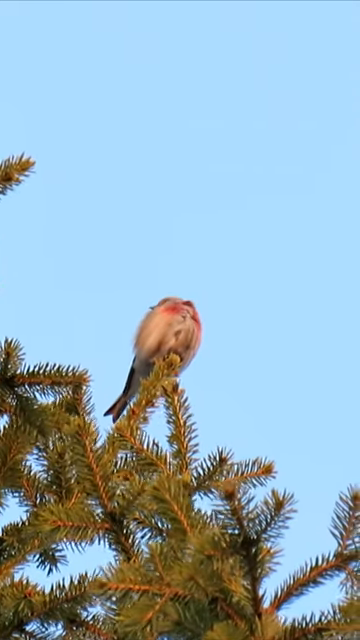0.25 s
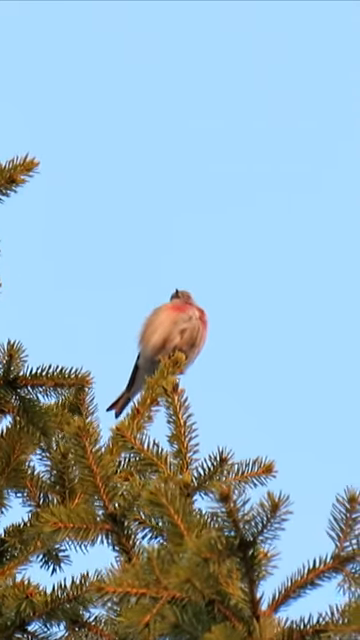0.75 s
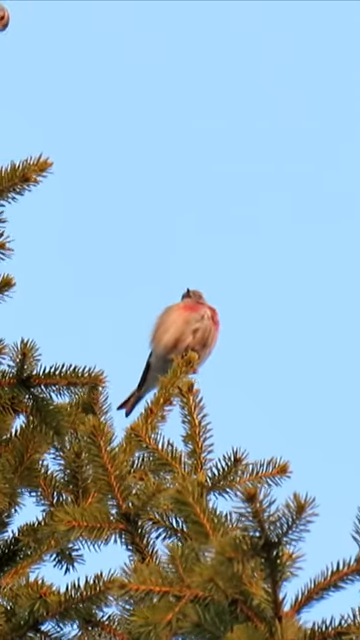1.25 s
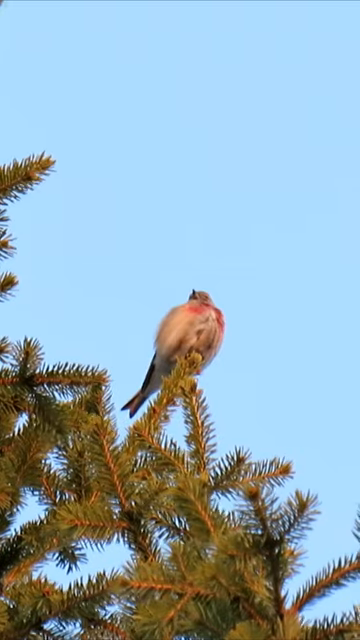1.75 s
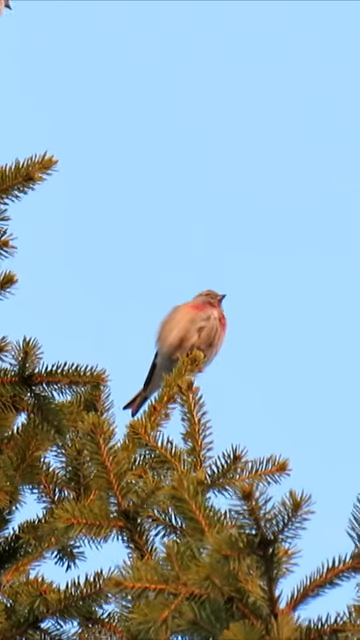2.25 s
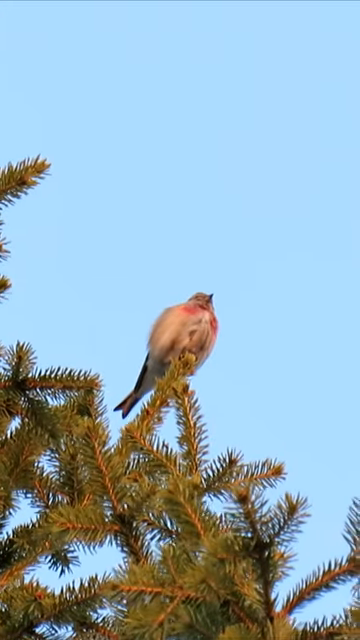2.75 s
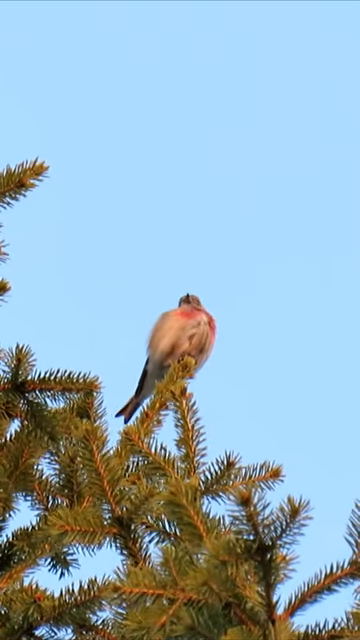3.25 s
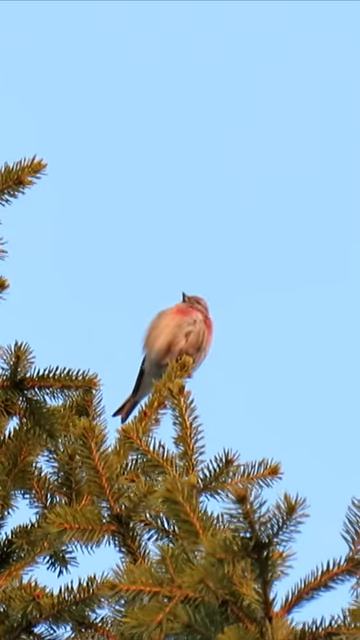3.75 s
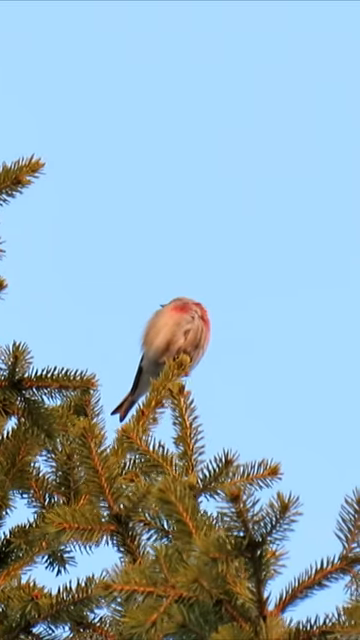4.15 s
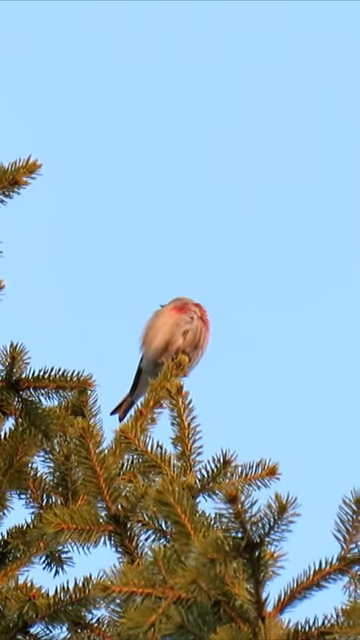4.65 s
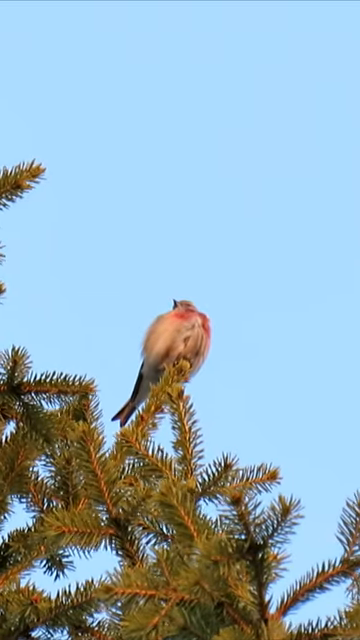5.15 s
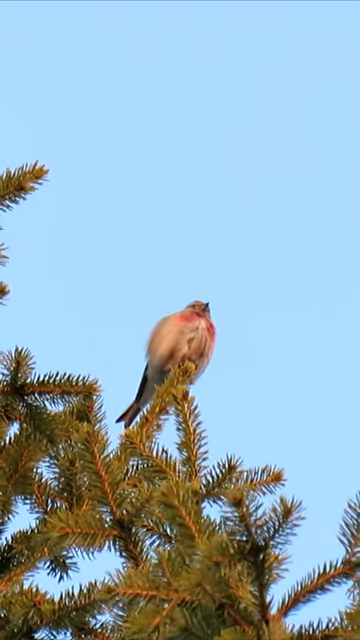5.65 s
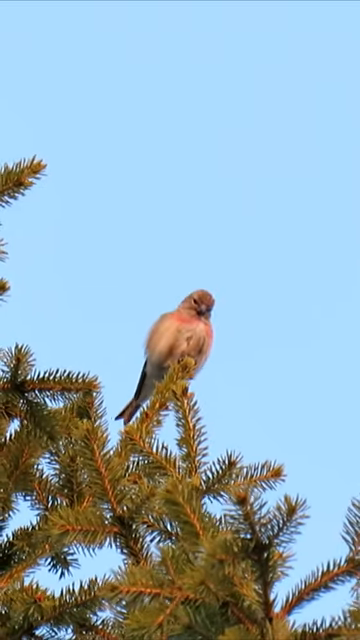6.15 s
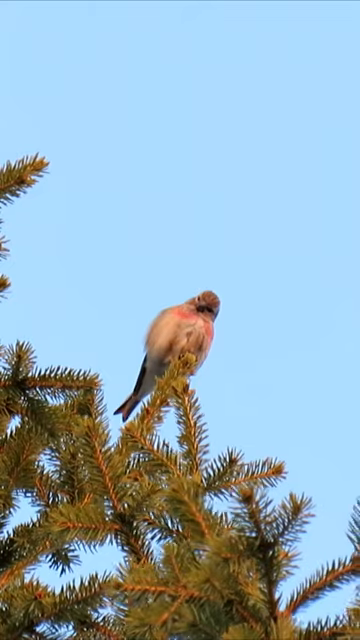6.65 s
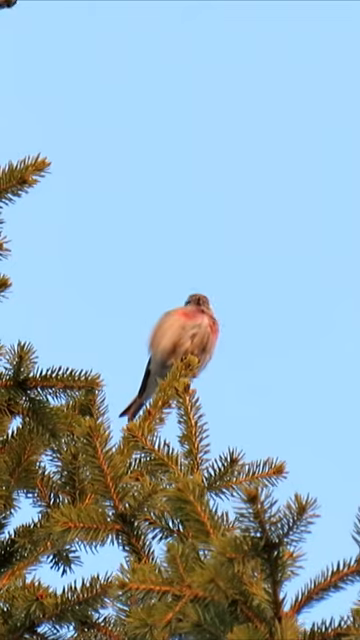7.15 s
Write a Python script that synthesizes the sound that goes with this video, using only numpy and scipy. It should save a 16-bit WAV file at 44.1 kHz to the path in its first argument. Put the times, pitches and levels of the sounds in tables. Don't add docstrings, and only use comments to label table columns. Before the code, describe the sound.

Lively songbird twittering outdoors: sharp chips, bright warbles, arched nasal calls and a quick slowing rattle, above faint traffic and hiss.

```python
import sys
import numpy as np
from scipy import signal
from scipy.fft import rfft, irfft
from scipy.io import wavfile
from scipy.ndimage import uniform_filter1d, map_coordinates

SR = 44100
rng = np.random.default_rng(int(sys.argv[2]) if len(sys.argv) > 2 else 0)


def gain_from_db(level_db):
    decades = np.asarray(level_db, float) / 20
    return 10 ** decades


def wav_record(signal):
    frames = np.transpose(np.atleast_2d(signal))
    bounded = np.clip(frames, -1, 1)
    quanta = np.round(bounded * 32767).astype(np.int16)
    wavfile.write(sys.argv[1], SR, quanta)


N = 326781
CLOCK = np.arange(N) / SR


def unit(x):
    return x / np.sqrt(np.mean(x ** 2) + 1e-20)


def along(points, hz):
    f, value = np.transpose(points)
    return np.interp(np.log(hz + 1), np.log(f + 1), value)


def wobble(rate, size=N):
    knots = rng.standard_normal(int(size * rate / SR) + 4)
    return map_coordinates(knots, [np.arange(size) * rate / SR])


# f/Hz, left-right likeness (0-1)
COHERENCE = [(60, 1), (150, 0.81), (380, 0.68), (950, 1), (2380, 0.88), (5980, 0.95), (15000, 0.99)]


def rush(spectrum, patchy_db):
    z = signal.stft(rng.standard_normal((2, N + 512)), nperseg=512)[2]
    field = rng.standard_normal(z.shape[1:])
    field = uniform_filter1d(uniform_filter1d(field, 5, 0), 12, 1)
    pair = signal.istft(z * gain_from_db(patchy_db * unit(field)), nperseg=512)[1][:, :N]
    hz = np.fft.rfftfreq(N, 1 / SR)
    turn = np.arccos(np.clip(along(COHERENCE, hz), -1, 1)) / 2
    coloured = rfft(pair) * gain_from_db(along(spectrum, hz))
    mid, side = irfft(coloured * [np.cos(turn), np.sin(turn)], N)
    return unit(np.array([mid + side, mid - side]))


# t/s, level/dB
TRAFFIC_LEVEL = [(0.0, -54.5), (2.43, -55), (2.77, -57), (4.31, -53), (6.31, -54), (7.08, -48), (7.41, -47)]
# f/Hz, density level/dB per Hz
RUMBLE = [(12, -35), (20, 1), (70, 3), (110, -1.5), (140, -10), (240, -120)]
TRAFFIC = [(53, -64), (125, -4.5), (225, -4.5), (389, -7.5), (429, -6), (764, -6.5), (1440, -6),
           (2050, -17), (2490, -13.5), (2600, -23), (3380, -19.5), (5720, -120)]
AIR = [(1060, -56), (1800, -6), (1970, -4.5), (3380, -10), (3600, -5), (4010, -6), (15500, -20.5)]


def traffic_and_air():
    traffic_db = np.interp(CLOCK, *np.transpose(TRAFFIC_LEVEL))
    noise = gain_from_db(-63.5) * rush(RUMBLE, patchy_db=0.0)
    noise += gain_from_db(traffic_db + 1.0) * rush(TRAFFIC, patchy_db=1.5)
    dropout = (CLOCK > 0.42) & (CLOCK < 0.573)
    hiss_db = -61.5 - 7.6 * dropout + 0.059 * (traffic_db + 43.5)
    return noise + gain_from_db(hiss_db) * rush(AIR, patchy_db=0.7)


# start t/s, end t/s, first f/Hz, last f/Hz, level/dB
DRONES = [(.3, 2.33, 224, 229, -65), (2.33, 3.1, 229, 226, -68), (3.22, 3.6, 468, 522, -61),
          (3.6, 4, 522, 538, -63), (4, 4.65, 538, 545, -62), (4.65, 5.2, 545, 510, -66),
          (3.85, 4.65, 480, 490, -67), (4.65, 5.7, 486, 452, -65), (3.9, 5.7, 405, 415, -68),
          (6.2, 7.6, 440, 452, -62), (6.7, 7.6, 465, 455, -62), (6.75, 7.6, 415, 430, -63),
          (6.65, 7.15, 540, 578, -63), (6.2, 6.8, 572, 590, -65), (3.1, 7.6, 51, 50.5, -57)]


def engine_drones():
    hum = np.zeros(N)
    for start, end, first_hz, last_hz, db in DRONES:
        hz = np.interp(CLOCK, [start, end], [first_hz, last_hz])
        on = np.clip(np.minimum(CLOCK - start, end - CLOCK) / 0.04, 0, 1)
        swell_db = db + 3 * wobble(4.2)
        unsteady_hz = hz * (1 + 0.00308 * wobble(3.6)) + 1.48 * wobble(15)
        hum += on * gain_from_db(swell_db) * np.sin(2 * np.pi * np.cumsum(unsteady_hz) / SR)
    return hum


# f/Hz, level/dB
WINDPIPE = [(1500, -0.5), (2500, 1), (3800, 3), (5500, 2), (7000, -4.5), (9000, -11), (12000, -17.5),
            (16000, -20.5)]


def syrinx(song, t, hz, db, partials, rough=0.063):
    size = len(t)
    turn = 2 * np.pi * np.cumsum(hz * (1 + 0.0038 * wobble(251.0, size))) / SR
    flicker_db = 0.7 + 0.08 * np.clip(-33 - np.max(db), 0, 30)
    tone = np.zeros(size)
    for k, level in partials:
        depth_db = flicker_db * np.sqrt(k) + 3.2 * (k * hz > 8500)
        flicker = depth_db * wobble(134.4 if k < 4 else 550, size)
        audible = k * hz < SR / 2.2
        tone += gain_from_db(level + along(WINDPIPE, k * hz) + flicker) * audible * np.sin(k * turn)
    place = song[round(t[0] * SR) + SR:][:size]
    place += gain_from_db(db) * (1 + rough * wobble(1500, size)) * tone


SINK_PER_DB, SINK_DB_PER_OCTAVE, SINK_HZ = 0.84, 13.5, 2500


def calls(song, rows, build, start, fall, overtones, undertones=()):
    rising, even_db, round_up, hold = build
    fall_hz, fall_share, fall_power = fall
    for s, length_ms, hz, db in rows:
        rise_ms, fall_ms = rising * length_ms, (1 - rising) * length_ms
        low_db = SINK_DB_PER_OCTAVE * np.log2(hz / SINK_HZ) - SINK_PER_DB * (db - even_db)
        end = fall_hz / hz + fall_share
        t = s + np.arange(-rise_ms * SR // 1000, fall_ms * SR // 1000) / SR
        away = np.where(t < s, (s - t) / rise_ms, (t - s) / fall_ms) * 1000
        bend = np.where(t < s, (1 - start) * away ** round_up, (1 - end) * away ** fall_power)
        smooth_hz = uniform_filter1d(hz * (1 - bend), 100)
        climb = np.where(t < s, away, -away)
        bright = [(k, level + (k - 2) * 6.0 * climb) for k, level in overtones]
        broken = []
        for k, level, growth in undertones:
            grown_db = level + growth * (s - ARCHES[0][0])
            broken.append((k, grown_db - 22 * np.abs(climb + 0.35)))
        breath_db = db - np.where(t < s, 20, 15) * away ** hold - 25 * away ** 16
        partials = [(1, low_db), (2, 0.031)] + bright + broken
        syrinx(song, t, smooth_hz, breath_db, partials, rough=0.044 + 0.013 * max(-20.5 - db, 0))


# crest t/s, length/ms, crest f/Hz, 2nd harmonic level/dB
FAR_CHIPS = [
    (0.001, 21, 2316, -56),
    (0.124, 29, 2310, -54),
    (0.243, 23, 2420, -57),
    (0.389, 16, 2460, -59),
]


def far_chips(song):
    calls(song, FAR_CHIPS, (0.1, -50, 2.0, 5.5), 0.85, (0, 0.82, 0.9), [(2, -19)])


# f/Hz, t60/s
NEEDLES = [(1500, 0.11), (4000, 0.046), (7000, 0.078), (12000, 0.0078)]
ECHO_DB = -14.5
SLAP_S, SLAP_WIDTH_S, SLAP_DB = 0.0222, 0.001, -0.5


def needles(x):
    wet, step = np.zeros(N + SR), SR // 8
    for a in range(0, N, step):
        hz, t, z = signal.stft(rng.standard_normal(SR // 2), SR, nperseg=256)
        t60 = along(NEEDLES, hz)[:, None]
        decay = gain_from_db(-60 * t / t60) + gain_from_db(-20.0 - 60 * t / (5 * t60))
        tail = signal.istft(z * decay, SR, nperseg=256)[1]
        slap = np.exp(-((CLOCK[:len(tail)] - SLAP_S) / SLAP_WIDTH_S) ** 2)
        tail = tail * (1 + gain_from_db(SLAP_DB) * slap)
        echo = signal.fftconvolve(x[a:a + step], tail / np.linalg.norm(tail))
        wet[a + 130:][:len(echo)] += echo
    return wet[:N]


# t/s, peak level/dB, f/Hz
KNOCKS = [
    (0.461, -41.5, 1110),
    (3.22, -38, 1140),
    (3.808, -39, 1190),
    (7.063, -33, 1010),
    (7.261, -31.5, 1090),
]


def knocks():
    out, t = np.zeros(N + SR), np.arange(SR // 20) / SR
    for s, db, hz in KNOCKS:
        puff = uniform_filter1d(rng.standard_normal(len(t)), 22)
        ring = np.sin(2 * np.pi * hz * t)
        out[round(s * SR):][:len(t)] += gain_from_db(db - 60 * t / 0.022) * (ring + 2 * puff)
    return out[:N]


# crest t/s, length/ms, crest f/Hz, 2nd harmonic level/dB
CHIPS = [(0.595, 15.7, 2440, -44), (0.733, 19.5, 2500, -40), (0.828, 20, 1765, -50.5),
         (0.887, 24, 2640, -31), (1.067, 18, 2550, -27.5), (1.784, 28, 2564, -30.5), (1.911, 37, 2793, -33),
         (2.435, 19.3, 2153, -21.5), (2.562, 25.6, 2405, -27), (2.669, 25, 2317, -29.5),
         (6.198, 23.3, 2576, -38.5), (6.409, 40, 3270, -34), (6.514, 29, 2450, -28.5),
         (7.154, 20, 2650, -40.5), (7.213, 21.4, 2766, -40), (7.275, 22, 2724, -38),
         (7.339, 21, 2796, -38.5), (7.408, 15, 2840, -42)]
# f/Hz, plus this share of its crest, power of the curve (under 1: quick at first)
CHIP_FALL = (980, .26, .55)


def chips(song):
    overtones = [(3, -17), (4, -21.0), (5, -29)]
    calls(song, CHIPS, (0.43, -41.5, 1.65, 2.66), 0.55, CHIP_FALL, overtones, [(2.9, -15, 0.0038)])


# share of the length, share of the pitch move, level over the peak/dB
FADE = [(0, 0, 1), (.4, .55, -3.5), (1, 1, -6)]
SWELL = [(0, 0, -14), (0.499, 0.43, 0.5), (1, 1, 0)]
BUILD = [(0, 0, -5), (.3, .6, 2.5), (.6, .85, 4), (1, 0.94, 1)]


def shaped(rows, shape):
    return [[(s + u * length, first + move * (last - first), db + under) for u, move, under in shape]
            for s, length, first, last, db in rows]


ATTACK_S = 0.0016


def notes(song, tables, partials, flutters=None):
    for i, table in enumerate(tables):
        s, hz, db = np.transpose(table)
        t = np.arange(s[0] - 0.004, s[-1] + 0.0019, 1 / SR)
        size = len(t)
        hz, db = (uniform_filter1d(np.interp(t, s, c), 90) for c in (hz, db))
        db = db - 25 * (np.clip(s[0] - t, 0, 1) / ATTACK_S + np.clip(t - s[-1], 0, 1) / 0.007)
        rough = 0.03 + 0.03 * max(-42 - db.max(), 0)
        if flutters:
            rate, swing, rising, throb_db, second_db = flutters[i]
            beat = ((t - s[0]) * rate - rising + 0.22 * wobble(34, size)) % 1
            phase = np.interp(beat, [0, 1 - rising, 1], [0, 1, 2])
            trough = uniform_filter1d(np.sin(np.pi / 2 * phase) ** 0.94, 50)
            hz = hz * (1 + swing * (1 + 9 / rate * wobble(rate, size)) * (1.2 - 2 * trough))
            pulsed = throb_db > 16
            hz = hz * (1 + 0.4 * pulsed * trough ** 4)
            db = db - throb_db * trough ** (0.5 + 1.2 * pulsed)
            second_db = second_db + swing * (58 * trough + 1600 / rate * wobble(rate, size))
            third_db = -15.5 + 0.16 * (db + 13.0)
            partials = [(1, 0), (2, second_db), (3, third_db), (4, second_db / 2 - 10)]
            rough = 1.1 * swing + 0.05
        syrinx(song, t, hz, db, partials, rough)


# t/s, f/Hz, level/dB
WHISTLES = [
    [(0.625, 4800, -63), (0.65, 5330, -56), (.68, 5380, -50), (0.71, 5200, -52), (0.782, 5590, -52.5),
     (0.805, 4600, -47), (0.82, 4080, -62)],
    [(.945, 2440, -66), (.97, 2700, -65), (1.03, 2500, -68), (1.07, 2400, -77)],
    [(1.186, 5700, -38.5), (1.19, 3940, -22), (1.195, 3590, -26), (1.203, 3420, -48)],
    [(1.197, 2550, -46), (1.206, 2770, -52), (1.213, 3560, -31), (1.218, 2800, -45)],
    [(1.494, 3120, -52), (1.512, 3200, -39), (1.53, 3260, -32.5), (1.55, 3343, -32), (1.595, 3306, -33),
     (1.64, 3380, -35), (1.668, 3336, -46.5)],
    [(2.732, 4040, -49.5), (2.76, 3600, -35.5), (2.78, 3400, -34), (2.82, 3304, -40), (2.87, 3270, -49.5),
     (2.89, 2840, -64), (2.92, 2454, -52.5), (3.02, 2387, -63)],
    [(5.8, 3730, -49), (5.85, 3950, -51), (5.885, 4000, -51)],
    [(5.885, 4120, -57), (5.897, 4130, -59), (5.92, 3560, -43.5), (5.935, 3290, -37), (5.95, 3045, -51.5),
     (6.03, 2983, -59), (6.12, 3230, -59)],
    [(6.758, 3420, -53), (6.77, 3270, -42.5), (6.785, 3002, -46.5), (6.86, 2960, -46.5), (6.92, 2990, -55),
     (7.045, 2950, -63)],
]
# t/s, length/s, first f/Hz, last f/Hz, peak level/dB
FADING = [(3.028, 0.016, 4940, 3720, -58.5), (1.219, .017, 2870, 2380, -42),
          (3.908, 0.014, 2425, 2140, -42), (4.832, 0.012, 5060, 3820, -27), (5.8, 0.095, 6600, 7050, -60),
          (5.805, 0.085, 5700, 5820, -59), (6.015, 0.096, 6850, 7150, -60), (6.933, 0.024, 5460, 5480, -52)]
SWELLING = [(1.83, 0.076, 4400, 3620, -59.5), (5.635, 0.013, 5870, 4520, -45.5),
            (5.657, 0.013, 5630, 5730, -53.5), (6.02, 0.056, 3370, 3860, -60.5),
            (6.27, 0.11, 2260, 2800, -62.5), (6.95, 0.022, 5360, 6550, -49)]


def whistles(song):
    tables = WHISTLES + shaped(FADING, FADE) + shaped(SWELLING, SWELL)
    notes(song, tables, [(1, 3.0), (2, -24.0), (3, -27.0)])


# t/s, length/s, first f/Hz, last f/Hz, peak level/dB
REEDY = [
    (1.218, 0.015, 3020, 2410, -49),
    (3.908, 0.031, 2300, 1980, -49),
]
# t/s, f/Hz, level/dB
REED = [(6.067, 3110, -44), (6.078, 2180, -52.5), (6.13, 2170, -45), (6.16, 2180, -55), (6.22, 2224, -54),
        (6.29, 2380, -62)]


def reedy_notes(song):
    notes(song, shaped(REEDY, FADE) + [REED], [(1, -7), (2, 3.0), (3, -13)])


CRESTS = [
    [2.086, 2.097, 2.107, 2.118, 2.129, 2.14, 2.152],
    [2.258, 2.269, 2.28, 2.291, 2.302],
    [5.715, 5.731, 5.745, 5.761, 5.778, 5.795, 5.811, 5.829, 5.847, 5.865, 5.882],
    [4.67, 4.683, 4.696, 4.708, 4.719],
    [4.503, 4.517, 4.53, 4.544],
    [1.291, 1.297, 1.3035, 1.3105, 1.3175, 1.326],
]
STRENGTHS = [
    [-2, -1.3, 0.51, 0.41, 1, 0.32, -1.1],
    [-5, 4.7, 2, 0.5, 1.3],
    [1, -1, 3, -4, 3, 1, 2, 1, 0.1, -1, -4],
    [0.47, -1.8, 3.2, -1, -1],
    [0.1, -1.3, 1, -2.2],
    [-7, -7, 3, 5.5, 4, -8],
]
# trough f/Hz, crest f/Hz, level/dB, 2nd harmonic level/dB
WARBLES = [
    [(1996, 3600, -32, -9), (2100, 3900, -22, -3.5)],
    [(2020, 4200, -29.5, -5.5), (2144, 3500, -24.5, 3.5)],
    [(1690, 2000, -48, -11), (1910, 2940, -34.5, -22.5)],
    [(3236, 3830, -15, -29), (3210, 3650, -29.5, -45)],
    [(3695, 3900, -16, -34), (3390, 3520, -25, -40)],
    [(4000, 4900, -28, -33), (3500, 4050, -21, -30)],
]
# rising share, throb/dB, power of the trend, roughness (0-1), height halfway up and halfway down (share)
BEATS = [(.55, 14, .5, .18, .6, .55), (.55, 12, .8, .18, .62, .55), (.22, 5, .45, .38, .6, .38),
         (.86, 6, 1.5, .03, .75, .4), (.84, 2.5, 2.2, .03, .95, .5), (.5, 13, .5, .05, .62, .55)]
# 2nd gain on the climb/dB, its unevenness/dB, 3rd level/dB, 3rd loss/dB per kHz of pitch,
# 2nd level in the tail/dB, haze of the 4th and 5th/dB
COLOURS = [(6, 2, -7, 26, 8, -24), (3, 1.5, -7, 26, 11, -25), (-5, 5, -28, 0, -16, -30),
           (0, 3, -19, 0, -40, -30), (0, 4, -16, 0, -38, -30), (0, 3, -34, 0, -30, -30)]
# t/s, f/Hz, level/dB
EDGES = [([(2.077, 2070, -40)], [(2.157, 2690, -47), (2.161, 2880, -34), (2.172, 2500, -51),
         (2.18, 2260, -59)]), ([(2.25, 2040, -47)], [(2.3065, 2500, -40), (2.311, 2980, -35),
         (2.32, 2576, -35.5), (2.332, 2270, -46.5), (2.338, 2320, -66)]), ([(5.695, 1780, -48)],
         [(5.888, 2300, -65)]), ([(4.651, 6000, -56), (4.654, 5380, -27), (4.658, 4030, -14.5)],
         [(4.722, 3500, -56), (4.75, 3650, -71)]), ([(4.481, 6340, -49), (4.484, 5650, -21.5),
         (4.488, 4260, -18)], [(4.548, 3460, -37), (4.564, 3550, -48)]), ([(1.285, 5100, -62)],
         [(1.33, 4000, -53)])]


def warbles(song):
    phrases = zip(CRESTS, STRENGTHS, WARBLES, BEATS, COLOURS, EDGES)
    for crests, strengths, (first, last), beat, colour, (lead, tail) in phrases:
        rising, throb_db, power, rough, up, down = beat
        climb_db, uneven_db, third_db, loss_db, tail_db, haze_db = colour
        way = np.linspace(0, 1, len(crests))[:, None] ** power
        trend = first + way * np.subtract(last, first)
        gaps = np.diff(crests, prepend=2 * crests[0] - crests[1])
        rows = list(lead)
        for s, gap, more_db, (low_hz, high_hz, db, _) in zip(crests, gaps, strengths, trend):
            db, span = db + more_db, high_hz - low_hz
            if s > crests[0]:
                rows.append((s - (1 + rising) * gap / 2, low_hz + down * span, db - throb_db / 2))
            rows.append((s - rising * gap, low_hz, db - throb_db))
            rows.append((s - rising * gap / 2, low_hz + up * span, db - 0.47 * throb_db))
            rows.append((s, high_hz * (1 + 0.011 * rng.standard_normal()), db))
        s, hz, db = np.transpose(sorted(rows + tail))
        t = np.arange(s[0], s[-1], 1 / SR)
        hz, db = (uniform_filter1d(np.interp(t, s, c), size=60, mode="nearest") for c in (hz, db))
        climb = uniform_filter1d(np.sign(np.gradient(hz)), size=90)
        beating = np.clip((crests[-1] - t) / 0.004 + 1, 0, 1) * np.clip((t - crests[0]) / 0.008 + 0.6, 0, 1)
        depth = (hz.max() - hz) / np.ptp(hz)
        lift_db = beating * (0.8 * throb_db * depth + climb_db * climb)
        octave_db = np.interp(t, [crests[0], crests[-1], crests[-1] + 0.005], [first[3], last[3], tail_db])
        second_db = octave_db + lift_db + uneven_db * wobble(66.2, len(t))
        haze = [(k, second_db + haze_db + 7 * beating * wobble(900, len(t))) for k in (4, 5)]
        high_loss_db = loss_db * np.clip(hz / 1000 - 2.9, 0, 9)
        partials = [(1, 0), (2, second_db), (3, third_db - high_loss_db)] + haze
        syrinx(song, t, hz, db, partials, rough)


# t/s, centre f/Hz, level/dB
DIVES = [
    [(1.334, 2760, -42.5), (1.40, 2960, -38.5), (1.46, 2920, -40.5), (1.488, 2740, -38)],
    [(6.668, 2180, -53), (6.68, 3340, -49), (6.745, 3620, -52)],
]
# beats per s, pitch swing share, rising share of a beat, throb/dB, 2nd harmonic level/dB
SHAKE = [
    (81, .02, .5, 18, -13),
    (126.2, 0.18, 0.55, -6, -43),
]


def pulsed_notes(song):
    notes(song, DIVES, None, SHAKE)


# t/s, length/s, first f/Hz, last f/Hz, peak level/dB
TRILLS = [
    (1.455, 0.14, 4300, 4380, -55),
    (7.025, 0.023, 4660, 4580, -52.5),
    (3.16, 0.088, 3520, 3490, -59.5),
    (4.998, 0.07, 5300, 5500, -55),
    (2.74, .06, 4500, 4800, -56),
]
# beats per s, pitch swing share, rising share of a beat, throb/dB, 2nd harmonic level/dB
FLUTTER = [(48.5, 0.0081, 0.44, 5, -23), (136, 0.22, 0.97, 2, -34), (175, 0.1, 0.27, 6, -28),
           (270, 0.18, 0.57, 1, -30), (280, 0.13, 0.39, 4, -32)]


def trills(song):
    notes(song, shaped(TRILLS, BUILD), None, FLUTTER)


# crest t/s, length/ms, crest f/Hz, 2nd harmonic level/dB
ARCHES = [
    (3.352, 49, 3124, -32),
    (3.508, 44.4, 2916, -30.5),
    (3.657, 51.4, 3080, -30.5),
    (3.814, 43.4, 2974, -32),
    (4.069, 35, 2650, -33.5),
]
LEANING = [(3.934, 50.6, 2866, -27)]
POINTED = [
    (4.235, 33, 2810, -30.5),
    (4.361, 40, 2770, -28.5),
]


def arches(song):
    overtones = [(3, -3.5), (4, -12.5), (5, -20.5)]
    undertones = [(1.5, -35.0, 34.3), (2.5, -26.5, 30.4)]
    shapes = ((ARCHES, 0.54, 1.45, 1.6), (LEANING, 0.33, 1.4, 1.1), (POINTED, 0.45, 0.95, 0.7))
    for rows, rising, round_up, curve in shapes:
        calls(song, rows, (rising, -41, round_up, 3.5), 0.59, (0, 0.78, curve), overtones, undertones)


# t/s, length/s, first f/Hz, last f/Hz, peak level/dB
FAR_NASAL = [(3.705, 0.072, 1020, 1053, -52.5)]


def far_nasal(song):
    notes(song, shaped(FAR_NASAL, FADE), [(3, -9), (4, -7), (5, -4), (6, -15)])


# t/s, length/s, first f/Hz, last f/Hz, peak level/dB
NASAL = [(3.91, 0.25, 1054, 1160, -66)]
GRUNT = [(4.178, 0.051, 1163, 1480, -44)]
# t/s, f/Hz, level/dB
DRAWL = [(4.292, 1088, -44.5), (4.31, 1387, -39), (4.33, 1406, -39), (4.48, 1430, -42.5),
         (4.57, 1480, -51.5)]
THREAD = [(4.891, 1494, -48), (4.901, 1541, -33.5), (4.925, 1567, -35), (4.94, 1575, -46),
          (5.02, 1647, -60)]


def nasal_notes(song):
    tables = [DRAWL, THREAD] + shaped(NASAL, FADE) + shaped(GRUNT, SWELL)
    notes(song, tables, [(1, -16.5), (2, -7), (3, 0.0), (4, -9.5), (5, -22), (6, -25)])


# t/s, f/Hz, level/dB
STOOPS = [
    [(4.565, 3450, -41), (4.578, 3180, -35), (4.59, 2680, -36), (4.603, 2280, -45)],
    [(4.752, 3150, -43), (4.762, 2770, -36), (4.781, 2360, -45)],
]


def stoops(song):
    notes(song, STOOPS, [(1, 1.0), (2, -17.5), (3, -25)])


# crest t/s, length/ms, crest f/Hz, 2nd harmonic level/dB
TWITTERS = [(4.829, 24, 2594, -33), (4.924, 31, 2525, -34), (5.042, 37, 2500, -35.5),
            (5.133, 29, 2450, -31.5), (5.219, 40, 2388, -32), (5.309, 39, 2566, -41), (5.43, 34, 2505, -40),
            (5.53, 29, 2520, -34.5), (5.611, 37, 2370, -31)]


def twitters(song):
    calls(song, TWITTERS, (0.99, -38.5, 1.5, 3.0), 0.68, (0, 0.75, 1.9), [(2.866, -6.0)], [(2.88, -23, 0.004)])


# t/s, f/Hz, level/dB
HOOKS = [
    [(5.182, 5010, -28), (5.185, 5340, -31), (5.1895, 3680, -24.5), (5.192, 3560, -46),
     (5.195, 4035, -24.5), (5.205, 4410, -33), (5.215, 4720, -23.5), (5.232, 6400, -26.5),
     (5.238, 6300, -52)],
    [(5.297, 5370, -23.5), (5.301, 3700, -30), (5.304, 2760, -47), (5.307, 4220, -19), (5.311, 4530, -26),
     (5.316, 3740, -26), (5.32, 4350, -31), (5.34, 4860, -23.5), (5.354, 5780, -29.5)],
    [(5.423, 5230, -25), (5.4275, 3540, -18.5), (5.433, 4700, -22.5), (5.447, 4694, -20),
     (5.453, 5170, -23), (5.475, 6050, -36)],
    [(5.547, 5330, -24.5), (5.553, 3140, -27.5), (5.559, 4250, -32), (5.58, 4500, -35.5), (5.6, 4600, -38)],
]


def hooks(song):
    notes(song, HOOKS, [(1, 2.0), (2, -26.5), (3, -17.5)])


RATTLE = [6.282, 6.296, 6.308, 6.323, 6.34, 6.357, 6.375, 6.396, 6.421, 6.446, 6.465, 6.489, 6.535, 6.558,
          6.581, 6.602]
RATTLE_FIRST_HZ, RATTLE_LAST_HZ, RATTLE_SAG_S = 6000, 3950, 0.073
RATTLE_DB, RATTLE_SWELL_S, SWELL_DB, FADE_DB_PER_S = -33.5, 0.044, 17, 64


def rattle(song):
    for s in RATTLE:
        age = s - RATTLE[0]
        hz = RATTLE_LAST_HZ + (RATTLE_FIRST_HZ - RATTLE_LAST_HZ) * np.exp(-age / RATTLE_SAG_S)
        db = RATTLE_DB - max(SWELL_DB * (1 - age / RATTLE_SWELL_S), FADE_DB_PER_S * (age - RATTLE_SWELL_S))
        half = 0.005 * (4000 / hz) ** 1.7
        t = s + np.arange(-half, half, 1 / SR)
        drop = 0.13 * ((hz / 5500) ** 3 - 0.55) * 2 * ((s - t) / half)
        syrinx(song, t, hz * (1 + drop), db - 18 * ((t - s) / half) ** 4, [(0.99, 0.91)])


def birds():
    song = np.zeros(N + 2 * SR)
    for voice in (far_chips, chips, whistles, reedy_notes, warbles, pulsed_notes, trills, arches,
                  far_nasal, nasal_notes, stoops, twitters, hooks, rattle):
        voice(song)
    return song[SR:SR + N]


def scene():
    song = birds()
    background = traffic_and_air() + engine_drones()
    return song + gain_from_db(ECHO_DB) * needles(song) + knocks() + background


def roll_off(x):
    return signal.sosfilt(signal.butter(12, 16460, fs=SR, output="sos"), x)


def record(dry):
    above = np.fft.rfftfreq(N, 1 / SR) > 15830
    limited = irfft(rfft(dry) * gain_from_db(-25 * above), N)
    return roll_off(limited)


dry = scene()
out = record(dry)
wav_record(out)
```